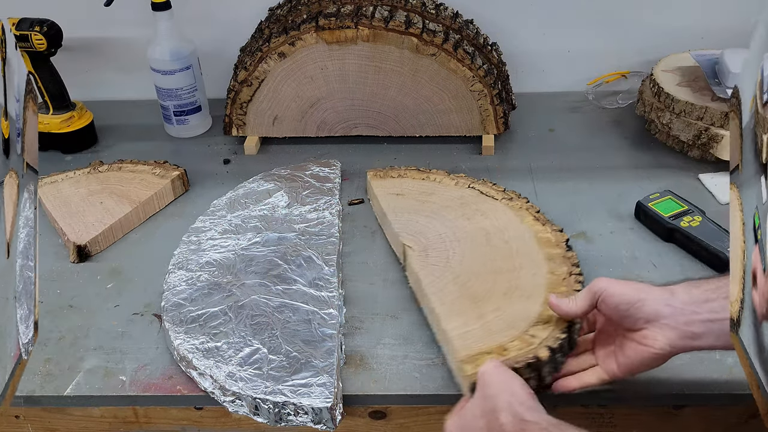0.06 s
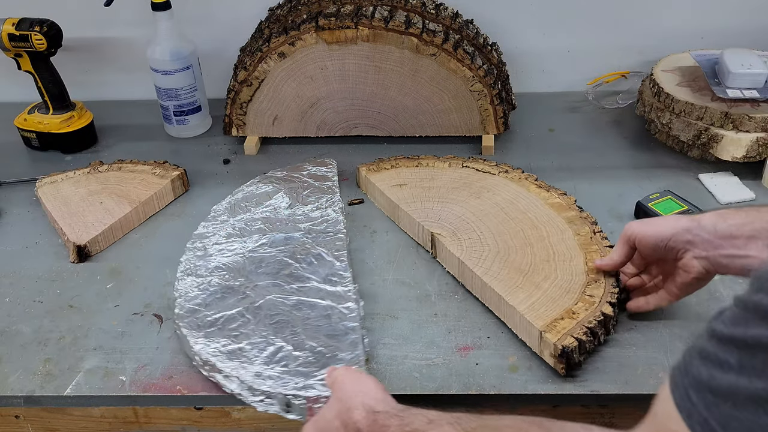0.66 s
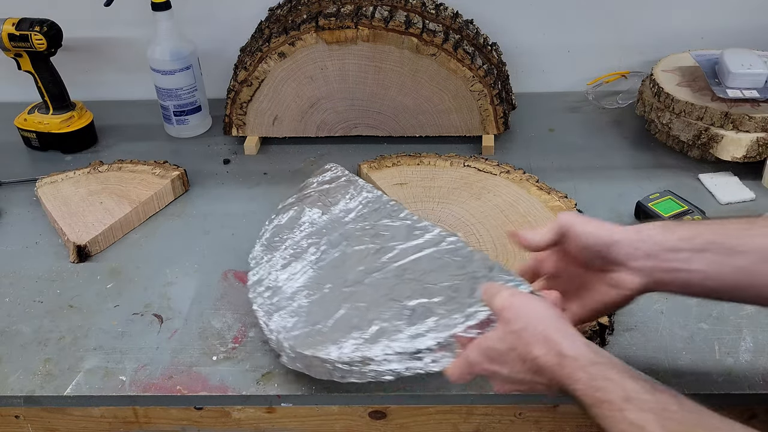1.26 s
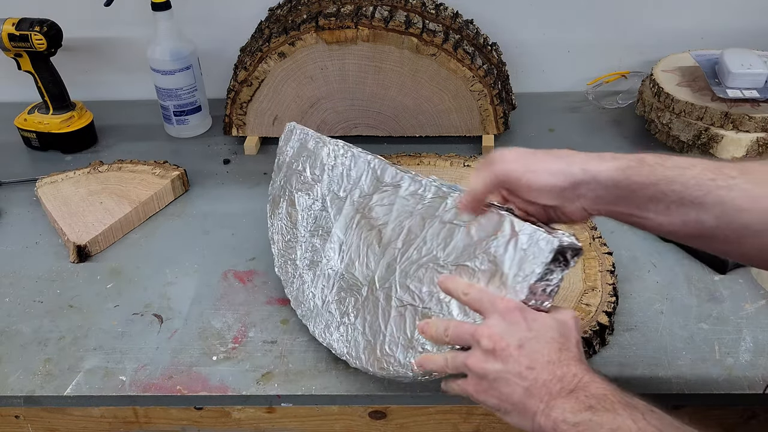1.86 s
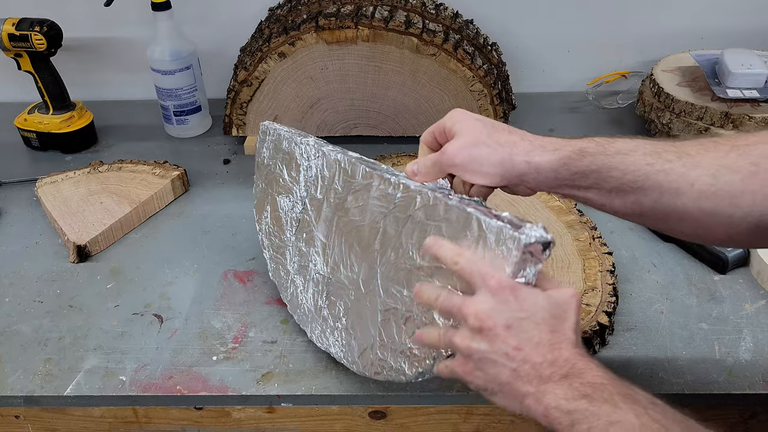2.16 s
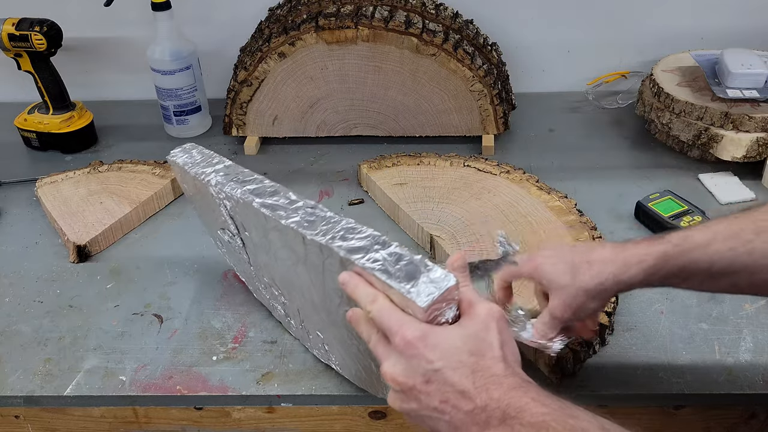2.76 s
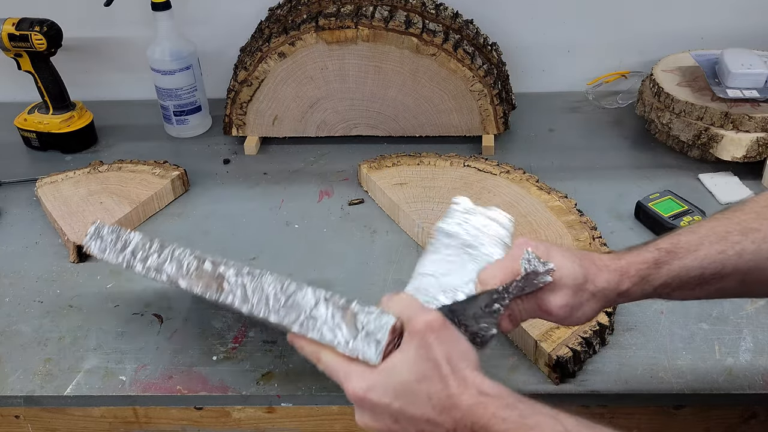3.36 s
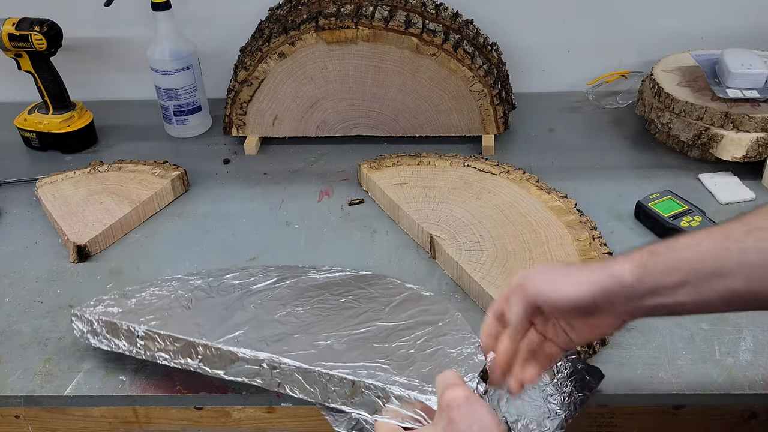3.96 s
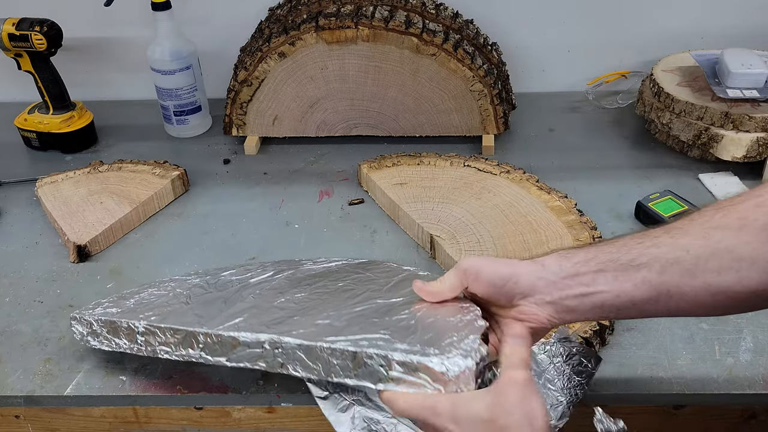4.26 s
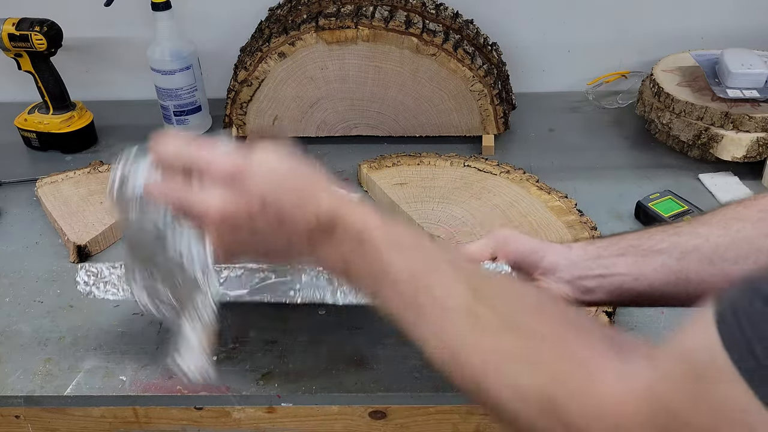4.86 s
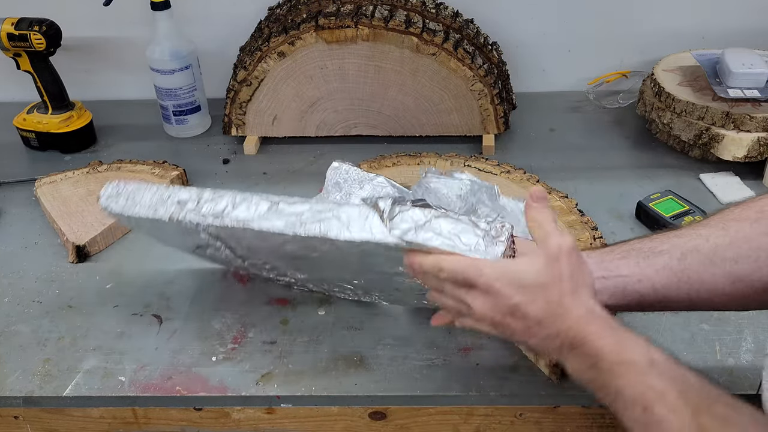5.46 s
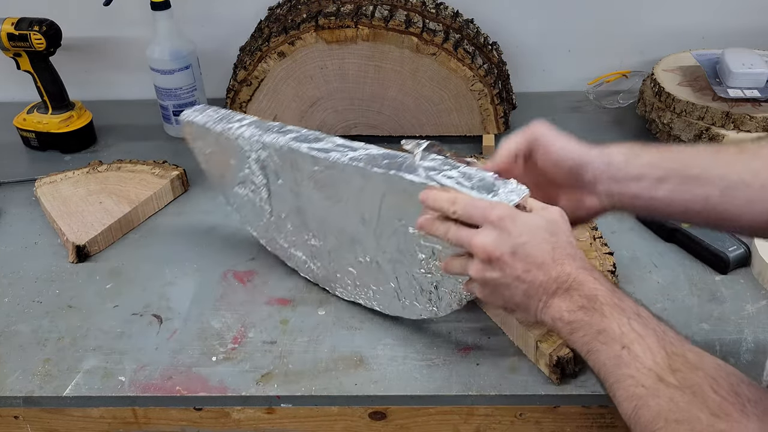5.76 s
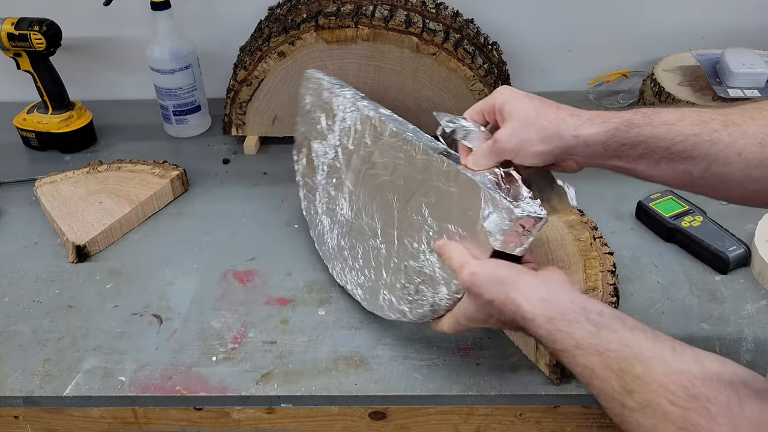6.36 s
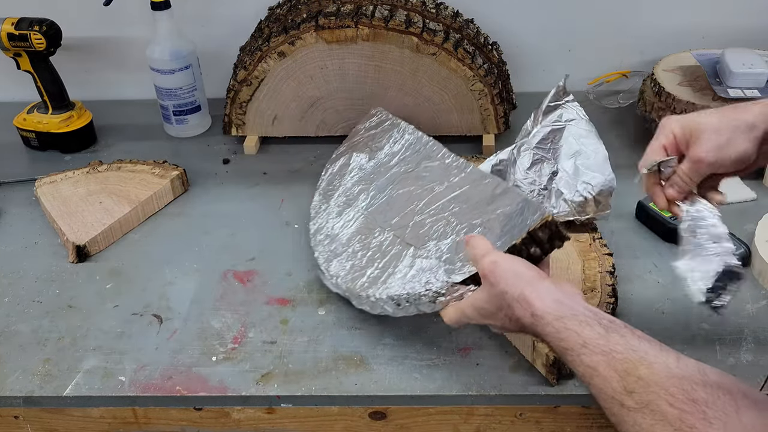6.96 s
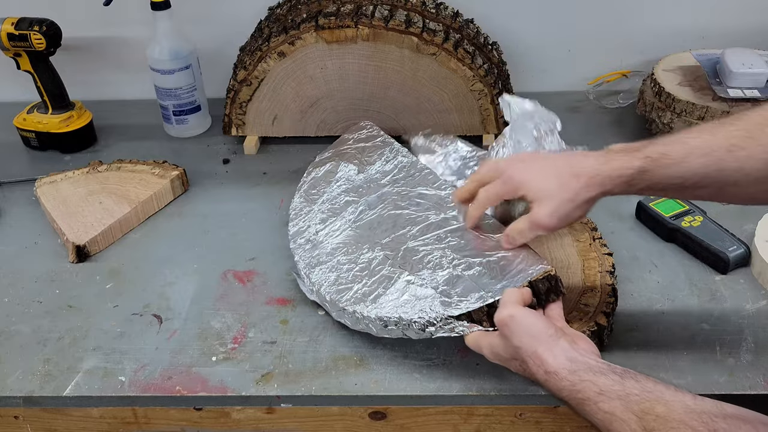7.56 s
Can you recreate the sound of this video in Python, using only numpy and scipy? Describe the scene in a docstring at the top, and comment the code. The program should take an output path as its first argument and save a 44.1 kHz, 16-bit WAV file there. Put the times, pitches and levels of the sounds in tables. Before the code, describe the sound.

Aluminium foil crinkles and crackles as it is peeled off a wooden slab, with a couple of wooden knocks on a workbench.

```python
"""Wooden slab and foil wrap on a workbench.

A slab slides over the bench and is set down with a knock; a foil-wrapped slab is then peeled open.
The foil crackles as tiny creases and facets buckle; large creases snap, loose panels pop and ring.
The wood scrapes by stick-slip and booms in the bench top. One microphone, about 1 m off, small workshop."""
import sys
import numpy as np
from scipy import signal
from scipy.fft import rfft, irfft
from scipy.io import wavfile
from scipy.ndimage import uniform_filter1d

SR = 44100
rng = np.random.default_rng(int(sys.argv[2]) if len(sys.argv) > 2 else 0)


def pcm_store(signal):
    """Save signal as 16-bit PCM."""
    levels = np.round(np.clip(np.atleast_2d(signal), -1, 1) * 32767)
    wavfile.write(sys.argv[1], SR, levels.astype(np.int16).T)


N = 340011
TIME = np.arange(N) / SR

# Grips and pulls on the foil (start [s], length [s], crackle [dB], swell over the length [dB],
# sheet flexing [dB re crackle], crease sparkle [dB re crackle])
FOIL_PULLS = [ (0.036, 0.044, -62, -4, -4, -12), (0.235, 0.0083, -61, -14, -15, -13),
              (0.516, 0.28, -52.5, 11.5, -10, -8), (0.838, 0.46, -57, -6.5, -2, -10.5),
              (1.419, 0.059, -50.5, -2, -15, -8), (1.513, 0.096, -61, 11, -7, -21),
              (1.674, 0.077, -50.5, -3.5, -10, -10), (1.805, 0.061, -54, 14, -13, -9),
              (1.929, 0.092, -53, -1.5, -18, -0.5), (2.10, 0.029, -59.5, -9, -20, -5),
              (2.208, 0.16, -51, -1, -23, -4), (2.375, 0.12, -44, 4, -24, -2.5),
              (2.555, 0.11, -28.5, 1, -15, -7.5), (2.717, 0.093, -29, -4, -8, -7.5),
              (2.821, 0.033, -36.5, 7, -7.5, -6), (2.918, 0.091, -53, 15, 0, -25),
              (3.057, 0.074, -38.5, -2, -7, -6.5), (3.151, 0.55, -35, -3, -8.5, -7),
              (3.478, 0.27, -33.5, 8.5, -7, -5.5), (3.784, 0.097, -39.5, -17.5, -8, -5),
              (3.881, 0.098, -34, -6.5, -9, -7), (4.034, 0.089, -41.5, -14, -8.5, -13),
              (4.264, 0.035, -39.5, 0, -10, -6.5), (4.364, 0.047, -43.5, -11.5, -9, -11),
              (4.428, 0.072, -28.5, 6.5, -9.5, -8), (4.537, .19, -31, 2.5, -12.5, -5),
              (4.777, 0.098, -38, -0.5, -11.5, -8), (4.921, .16, -32.5, 2, -11, -8),
              (5.224, 0.069, -43.5, 5.5, -5.5, -10), (5.417, 0.07, -42, 5.5, -11, -15),
              (5.534, 0.043, -37, 9, -17.5, -9), (5.66, 0.099, -37.5, -4, -13, -9),
              (5.792, 0.3, -36.5, -2.5, -11, -7.5), (6.161, 0.17, -37.5, 0, -9, -9),
              (6.373, 0.15, -37, 3, -8.5, -7), (6.589, 0.18, -30.5, 2.5, -8.5, -9),
              (6.813, 0.072, -34.5, -5.5, -11, -9.5), (6.972, 0.11, -45, 5, -5, -9),
              (7.063, 0.071, -40.5, 2.5, -4.5, -7.5), (7.199, 0.044, -31, -6, -8, -8),
              (7.341, 0.092, -33, -2.5, -6, -7), (7.476, 0.035, -36, -6, -11, -9),
              (7.537, .165, -31.5, 5.5, -8.5, -10)]
# Unevenness of the crackle (time [s], crack size scale [dB]). Near zero: even rustle.
# Far from zero either way: spiky. Negative values leave the largest cracks uncapped.
FOIL_UNEVENNESS = [(0, -12.5), (1.4, -4.5), (2.4, 6), (2.6, -1), (3.1, -1), (3.6, -0.5), (4.0, 2.5),
                   (4.6, 2), (5.4, 3.5), (6.4, 7.5), (7.2, -2.5), (7.71, -1.5)]
# Crackle spectrum (frequency [Hz], gain [dB])
FOIL_SPECTRUM = [(59, -46), (100, -6), (181, -16.5), (243, -4), (334, -4), (469, 1), (511, -2.5), (631, 1),
                 (702, -1.5), (1780, -6), (2780, -2), (3590, -1.5), (6350, -2), (10100, -10.5),
                 (15800, -23.5)]
# Large creases snapping through (time [s], relative energy [dB], t60 [s])
CREASE_SNAPS = [(1.426, -34.5, 0.029), (1.4335, -28, 0.05), (1.441, -39, 0.012), (1.4658, -32, 0.021),
                (1.801, -42.5, 0.014), (2.297, -40.5, 0.0071), (2.372, -42, .06), (2.456, -30, 0.13),
                (2.462, -21.5, 0.0085), (2.91, -31, .04), (2.949, -32, 0.06), (3.128, -25, 0.042),
                (3.1565, -23, 0.007), (3.219, -26, 0.012), (3.4737, -20.5, 0.01), (3.502, -22, 0.0051),
                (3.5436, -18.5, 0.075), (3.597, -19.5, .04), (3.6587, -21.5, 0.011), (4.037, -30, 0.058),
                (4.19, -35, .08), (4.2494, -29.5, 0.0066), (4.288, -30.5, 0.044), (4.415, -28, .04),
                (4.483, -23.5, .07), (4.716, -23.5, 0.039), (4.902, -26, 0.047), (5.181, -31.5, 0.11),
                (5.227, -28, 0.058), (5.27, -29.5, 0.0039), (6.154, -31, 0.13), (6.5945, -29.5, .008),
                (6.77, -24.5, 0.017), (6.974, -37, 0.017), (7.188, -23.5, 0.13), (7.337, -26, 0.048),
                (7.391, -20, 0.1), (7.517, -31, .008), (7.53, -22.5, 0.051)]
# Loose panels popping (time [s], level [dB], pitch [Hz], t60 [s])
PANEL_POPS = [(2.594, -20.5, 2620, 0.062), (2.753, -26, 960, 0.045), (2.805, -29, 812, 0.066),
              (3.420, -25.5, 792, .07), (3.548, -27.5, 241.5, 0.21), (3.603, -32, 471, 0.34),
              (4.59, -27, 996, 0.065), (4.708, -10, 640, 0.0096), (4.718, -17.5, 304, 0.015),
              (5.416, -32.5, 1387, 0.16), (5.415, -31.5, 2670, 0.083), (5.417, -35, 4600, 0.073),
              (5.546, -37, 1556, 0.11), (6.152, -17, 610, 0.0054), (6.876, -22.5, 1520, .023),
              (7.42, -22, 1104, 0.029), (7.468, -19, 640, 0.018), (7.517, -25, 785, 0.073)]
# Wood on wood (time [s], level [dB], contact hardness as low-pass cutoff [Hz])
WOOD_KNOCKS = [(.242, -53.5, 2000), (1.0122, -30, 1700), (1.033, -13, 820), (1.0655, -16.5, 590),
               (1.452, -27, 108), (3.537, -41, 304), (3.735, -46, 149), (4.703, -48, 400),
               (6.143, -61, 900), (6.735, -14.5, 112), (6.761, -18, 134), (6.825, -20.5, 310),
               (6.845, -24.5, 140), (7.189, -46, 150)]
# Modes of the loaded bench top (frequency [Hz], level [dB], t60 [s])
BENCH_MODES = [(59, -19, 0.13), (90.4, -1, 0.2), (122.3, -5.5, 0.24), (181.4, -11, 0.19), (240, -2.5, 0.15),
               (281, 15.5, 0.036), (348, 1.5, 0.13), (372, -2, 0.13), (422.6, -0.5, 0.1), (527, 9, 0.031),
               (634, -2.5, 0.087), (763, -6.5, 0.079), (910, 12.5, 0.02), (1170, -7, 0.043)]
# Slabs pushed or rocked (start [s], length [s], hollow body [dB], grit [dB], bench rumble [dB])
SLAB_SHOVES = [(0.075, 0.13, -58, -57, -56.5), (0.416, 0.15, -47.5, -45.5, -61),
               (0.67, 0.42, -52, -52, -55), (1.285, 0.16, -55, -59.5, -51.5),
               (1.656, .16, -55.5, -62, -51.5), (3.14, .06, -62, -78, -55), (3.715, 0.043, -63, -70, -48.5),
               (3.964, 0.13, -54, -62, -60), (4.443, .10, -54, -70, -53), (6.47, 0.22, -58, -70, -55),
               (6.997, 0.24, -52.5, -73, -44.5)]
# Scrape spectrum (frequency [Hz], gain [dB])
SCRAPE_SPECTRUM = [(88, -75.5), (150, -7), (254, -1.5), (322, -6.5), (500, 5.5), (1030, -6.5),
                   (1710, -16.5), (2100, -16.5), (2580, -16.5), (5000, -27), (6500, -62), (11000, -120)]
# Slab juddering against its neighbour (time [s], slip rate [Hz], level [dB])
SLAB_JUDDER = [(6.96, 108, -61), (7.03, 120, -46), (7.10, 160, -42), (7.16, 130, -43), (7.20, 115, -36),
               (7.25, 124, -32), (7.31, 130, -43), (7.34, 150, -59)]
# Room air spectrum (frequency [Hz], gain [dB])
AIR_SPECTRUM = [(18, -47.5), (30, -15), (97, 5), (384, -8.5), (859, -6.5), (2430, -18.5), (7240, -15),
                (9890, -38), (15000, -38)]


def foil_crackle(work, flexing, sparkle):
    """Creases and facets buckle in bursts; harder working buckles more creases."""
    rate_hz = 1400 * np.sqrt(work / undb(-37.5)) * undb(4.9 * wander(31)) + 150
    cracks = steady(crease_cracks(rate_hz, size_scale_db=curve(FOIL_UNEVENNESS)), span_s=0.04)
    swarm = cracks + undb(-5) * unit(facet_pings())
    swarm += undb(-8.5) * unit(panel_resonance(cracks))
    swarm = colour(steady(swarm, span_s=0.099), FOIL_SPECTRUM)
    # The loose sheet radiates the lows, tight creases the highs.
    lows = filt(swarm, 1046, "low", order=3)
    mids = filt(swarm, [1200, 9000], "band", order=3)
    highs = filt(swarm, 8570, "high", order=3)
    highs *= np.abs(uniform_filter1d(cracks ** 2, SR // 400)) ** 0.23  # hard cracks sparkle most
    return work * unit(mids) + flexing * unit(lows) + sparkle * unit(highs)


def pull_gains(rest_db=-73.5):
    """Hand work as gains of crackle, flexing and sparkle; overlapping pulls add in power."""
    power = np.zeros((3, N)) + undb(rest_db) ** 2 / np.array([[1], [10], [10]])
    for start_s, length_s, db, swell_db, flex_db, sparkle_db in FOIL_PULLS:
        gain = stroke(start_s, length_s, rise_t60_s=0.14, fall_t60_s=0.15, swell_db=swell_db)
        power += np.outer(undb([db, db + flex_db, db + sparkle_db]), gain) ** 2
    return np.sqrt(power)


def crease_cracks(rate_hz, size_scale_db, crack_t60_s=0.004, shiver_db=-19, shiver_t60_s=0.04):
    """Tiny creases give way: a dry crack along the fold, then a shiver through the sheet."""
    t = TIME[:SR // 16]
    envelope = (fade(t, crack_t60_s) + undb(shiver_db) * fade(t, shiver_t60_s)) * attack(t, 0.0007)
    power = convolve(clicks(rate_hz, size_scale_db) ** 2, envelope ** 2)
    return np.sqrt(np.abs(power)) * rng.standard_normal(N)


def facet_pings(spread_db=5, count=5000, samples=600):
    """Flat facets flip and ring for a few cycles, each at its own pitch."""
    onset, pitch, sustain, force = rng.random((count, 4)).T[:, :, None]
    t = TIME[:samples]
    hz = 450 * 20 ** pitch
    t60_s = 5 * 4 ** sustain / hz
    gain = undb(spread_db * np.minimum(-np.log(1 - force), 3)) * hz
    pings = gain * np.sin(2 * np.pi * hz * t) * fade(t, t60_s) * np.linspace(1, 0, samples)
    indices = (onset * N).astype(int) + np.arange(samples)
    return np.bincount(indices.ravel(), pings.ravel())[:N]


def panel_resonance(cracks, relative_width=0.026, swell_db=6, count=22):
    """Wide panels resonate with the cracks; each swells and dies as the sheet bends."""
    out = np.zeros(N)
    edges = np.array([1 - relative_width / 2, 1 + relative_width / 2])
    for hz in np.geomspace(400, 3300, count) * 2 ** rng.uniform(-0.07, 0.07, count):
        band = filt(cracks, hz * edges, "band", order=1)
        out += band * undb(swell_db * np.minimum(wander(29.6), 1.6))
    return out


def crease_snaps(ring_hz=2800, scatter_oct=0.14, ring_t60_s=0.012, ring_db=-4, shiver_db=-21):
    """Large creases snap through: crack, short ring, shiver."""
    out, t = np.zeros(N), TIME[:SR // 12]
    for time_s, db, t60_s in CREASE_SNAPS:
        hz = ring_hz * 2 ** (scatter_oct * rng.standard_normal())
        crack = rng.standard_normal(len(t)) * (fade(t, t60_s) + undb(shiver_db) * fade(t, 0.12))
        ring = undb(ring_db) * np.sin(2 * np.pi * hz * t) * fade(t, ring_t60_s)
        snap = (crack + ring) * attack(t, 0.00071) ** 2
        snap = filt(filt(snap, 280, "high", order=1), 7100, "low")
        add(out, time_s, undb(db + 22) * snap / np.linalg.norm(snap))
    return out


def panel_pops(overtone_ratio=4.9, overtone_db=-10, flutter_rad=0.65):
    """A panel flips and rings in its two lowest modes, fluttering as it settles."""
    out, t = np.zeros(N), TIME[:SR // 5]
    for time_s, db, hz, t60_s in PANEL_POPS:
        phase = 2 * np.pi * hz * t + flutter_rad * wander(100, len(t))
        fundamental = np.sin(phase) * fade(t, t60_s)
        overtone = undb(overtone_db) * np.sin(overtone_ratio * phase) * fade(t, t60_s / 2)
        add(out, time_s, undb(db) * (fundamental + overtone) * attack(t, 0.00071))
    return filt(filt(out, 6200, "low", order=4), 230, "high", order=3)


def wood_knocks(tick_db=17, thud_db=10, tail_db=-5):
    """Blows ring the bench and rattle what lies on it; soft contacts reach only the low modes."""
    out, modes = np.zeros(N), bench_response()
    t = TIME[:len(modes)]
    boom = modes * attack(t, 0.0072)
    envelope = (undb(tick_db) * fade(t, 0.0015) + undb(thud_db) * fade(t, 0.026)
                + undb(tail_db) * fade(t, 0.094))
    for time_s, db, cutoff_hz in WOOD_KNOCKS:
        rattle = filt(rng.standard_normal(len(t)) * envelope, 140, "high")
        add(out, time_s, undb(db) * filt(boom + rattle, cutoff_hz, "low"))
    return filt(out, 43, "high", order=4)


def bench_response(length_s=0.6):
    """Damped modes of the bench top after one impulse."""
    t = TIME[:int(length_s * SR)]
    return sum(undb(db) * np.sin(2 * np.pi * hz * t) * fade(t, t60_s) for hz, db, t60_s in BENCH_MODES)


def slab_slide(foil_work, handling_db=-32.5):
    """Rough wood catches and slips; the bench rumbles under each shove and each pull on the foil."""
    body_gain, grit_gain, rumble_gain = sum(
        np.outer(undb(levels_db), stroke(start_s, length_s, rise_t60_s=0.48, fall_t60_s=0.46))
        for start_s, length_s, *levels_db in SLAB_SHOVES)
    slips = unit(clicks(rate_hz=2500, size_scale_db=5.5))
    scrape = colour(slips, SCRAPE_SPECTRUM)
    body = unit(filt(scrape, 845, "low", order=3)) * body_gain
    grit = unit(filt(scrape, [700, 2500], "band")) * grit_gain
    bench_lows = filt(convolve(slips, bench_response()), [50, 150], "band")
    rumble = steady(bench_lows, span_s=0.06) * np.hypot(rumble_gain, undb(handling_db) * foil_work)
    return body + grit + rumble


def slab_judder(jitter=0.056, octave_db=-16):
    """Stick-slip falls into a rough rhythm; the slab groans."""
    slip_hz = curve(SLAB_JUDDER) * (1 + jitter * wander(45))
    phase = 2 * np.pi * np.cumsum(slip_hz) / SR
    groan = np.sin(phase) + undb(octave_db) * np.sin(2 * phase)
    gate = (TIME >= SLAB_JUDDER[0][0]) & (TIME <= SLAB_JUDDER[-1][0])
    return groan * undb(curve(SLAB_JUDDER, column=2)) * gate


def scattered_echoes(x, low_t60_s, high_t60_s, directions=6):
    """Each crack leaves the crumpled sheet in another direction and meets other echoes."""
    shares = filt(rng.standard_normal((directions, N)), 58.6, "low")
    shares /= np.linalg.norm(shares, axis=0)
    return sum(room_echoes(x * share, low_t60_s, high_t60_s) for share in shares)


def room_echoes(x, low_t60_s, high_t60_s, split_hz=3500, delay_s=0.003):
    """Dense small-room echoes; lows and highs decay at separate rates."""
    t = TIME[:SR * 3 // 4]
    noise = rng.standard_normal(len(t))
    lows = filt(noise, split_hz, "low", order=1)
    tail = lows * fade(t, low_t60_s) + (noise - lows) * fade(t, high_t60_s)
    tail *= attack(t - delay_s, 0.0005)
    return convolve(x, tail / np.linalg.norm(tail))


def room_air(level_db=-65):
    """Faint steady rumble and hiss."""
    noise = colour(rng.standard_normal(N), AIR_SPECTRUM)
    return undb(level_db) * unit(filt(noise, 49, "high"))


def stroke(start_s, length_s, rise_t60_s, fall_t60_s, swell_db=0):
    """Gain of one hand movement: build-up, swell or easing, decay."""
    t = TIME - start_s
    rise = fade(np.clip(-t, 0, 1), rise_t60_s)
    swell = undb(swell_db * (np.clip(t / length_s, 0, 1) - 0.5))
    fall = fade(np.clip(t - length_s, 0, 1), fall_t60_s)
    return rise * swell * fall


def clicks(rate_hz, size_scale_db):
    """Random impulses of log-normal size; only a positive scale caps the largest."""
    chance, size = rng.random(N), rng.standard_normal(N)
    return (chance < rate_hz / SR) * undb(size_scale_db * np.minimum(size, 2.3)) * rng.choice([-1, 1], N)


def wander(hz, samples=N):
    """Random drift below hz, rms 1."""
    return unit(filt(rng.standard_normal(samples), hz, "low"))


def steady(x, span_s):
    """Hold the short-time rms near 1."""
    span = int(span_s * SR)
    power = uniform_filter1d(uniform_filter1d(x ** 2, span), span)
    return x / np.sqrt(np.abs(power) + np.mean(x ** 2) / 1000)


def colour(x, spectrum, size=4096):
    """Minimum-phase filter; falls 12 dB/octave below the spectrum's first point."""
    hz, db = np.transpose(spectrum)
    bin_hz = np.maximum(np.arange(size // 2 + 1) * SR / size, 1)
    bin_db = np.interp(np.log(bin_hz), np.log(hz), db) - 12 * np.maximum(np.log2(hz[0] / bin_hz), 0)
    cepstrum = irfft(np.log(undb(bin_db)))
    cepstrum[1:size // 2] *= 2
    cepstrum[size // 2 + 1:] = 0
    return convolve(x, irfft(np.exp(rfft(cepstrum))))


def filt(x, hz, kind, order=2):
    """Butterworth filter."""
    return signal.sosfilt(signal.butter(order, hz, kind, fs=SR, output="sos"), x)


def convolve(x, response):
    """Play x through an impulse response."""
    return signal.oaconvolve(x, response)[:N]


def curve(rows, column=1):
    """Table column, interpolated over time."""
    rows = np.array(rows)
    return np.interp(TIME, rows[:, 0], rows[:, column])


def attack(t, rise_s):
    """Linear ramp to 1."""
    return np.clip(t / rise_s, 0, 1)


def fade(t, t60_s):
    """Exponential decay."""
    return np.exp(-np.log(1000) * t / t60_s)


def add(out, time_s, sound):
    """Mix a sound in at time_s."""
    i = int(time_s * SR)
    out[i:i + len(sound)] += sound[:N - i]


def undb(db):
    """Decibels to gain."""
    return 10 ** (np.asarray(db) / 20)


def unit(x):
    """Scale to rms 1."""
    return x / np.sqrt(np.mean(x ** 2))


def scene():
    """Foil and wood with their echoes, over room air; mono."""
    work, flexing, sparkle = pull_gains()
    foil = foil_crackle(work, flexing, sparkle) + crease_snaps() + panel_pops()
    foil += undb(-4.5) * scattered_echoes(foil, low_t60_s=0.27, high_t60_s=0.2)
    wood = wood_knocks() + slab_slide(work) + slab_judder()
    wood += undb(-5.5) * room_echoes(wood, low_t60_s=0.42, high_t60_s=0.83)
    return (foil + wood + room_air())[None]


def record(dry):
    """Steep low-pass at 15.9 kHz."""
    return signal.sosfilt(signal.ellip(10, 0.1, 80, 15900, fs=SR, output="sos"), dry)


dry = scene()
out = record(dry)
pcm_store(out)
```